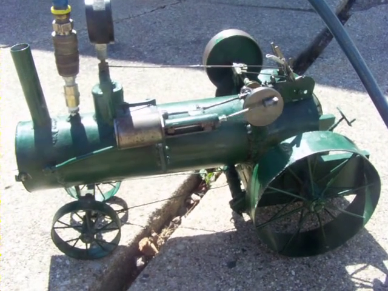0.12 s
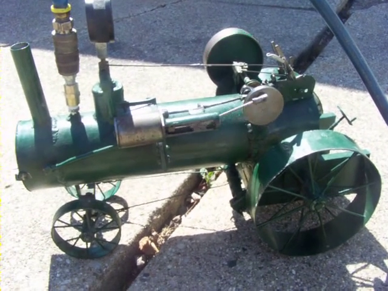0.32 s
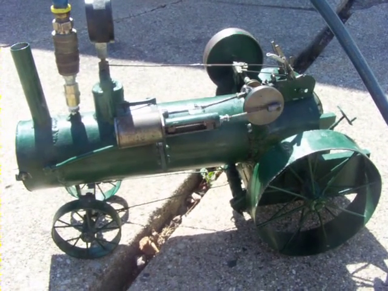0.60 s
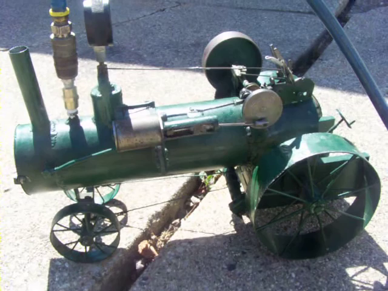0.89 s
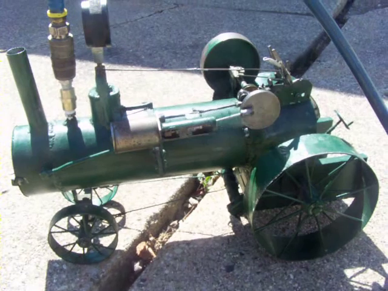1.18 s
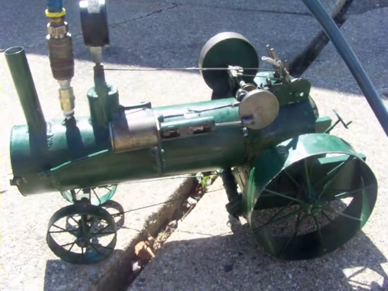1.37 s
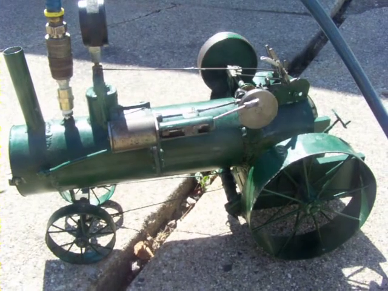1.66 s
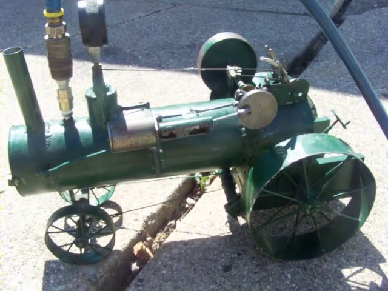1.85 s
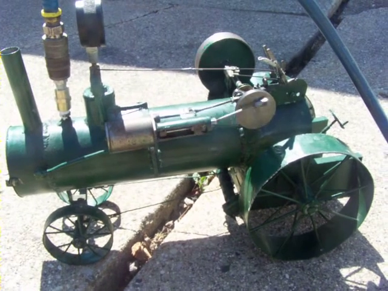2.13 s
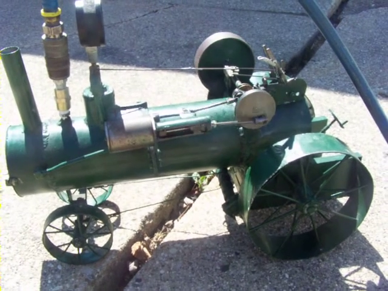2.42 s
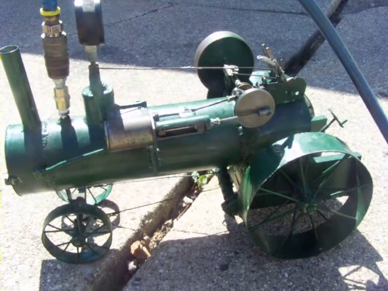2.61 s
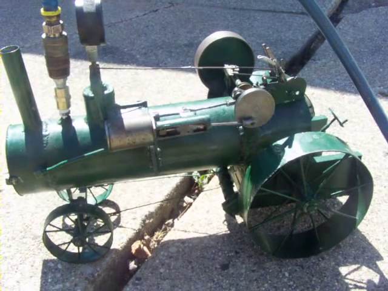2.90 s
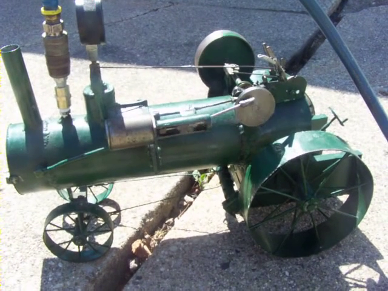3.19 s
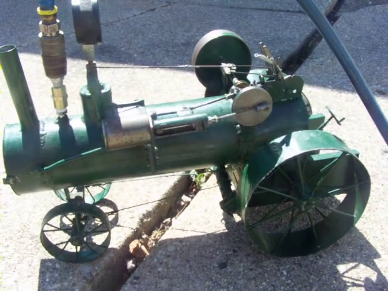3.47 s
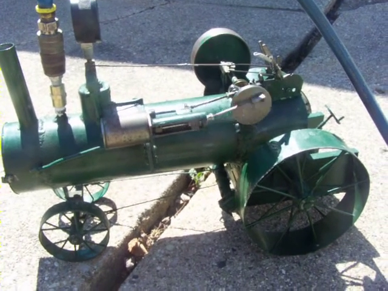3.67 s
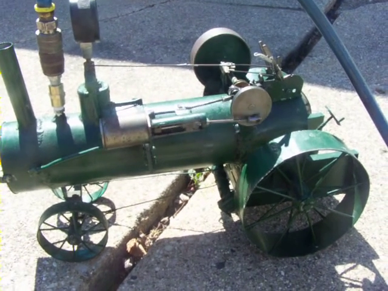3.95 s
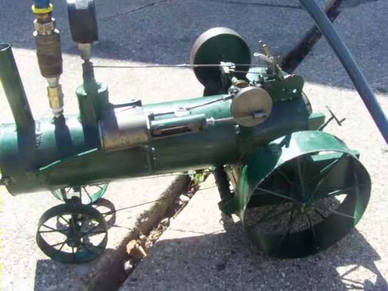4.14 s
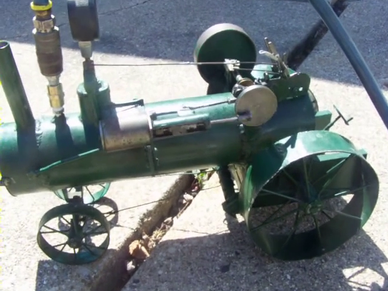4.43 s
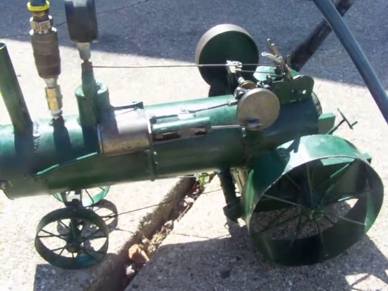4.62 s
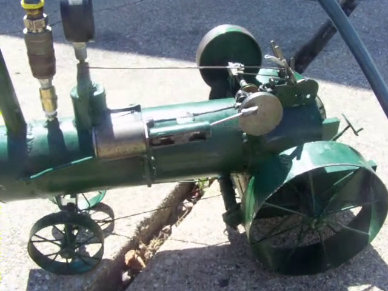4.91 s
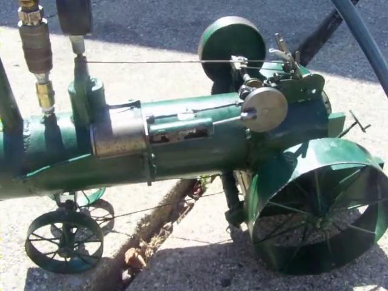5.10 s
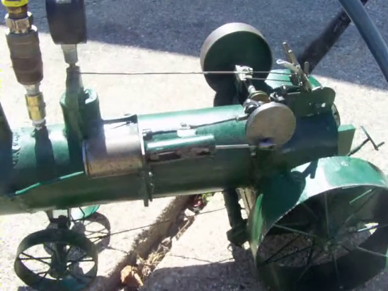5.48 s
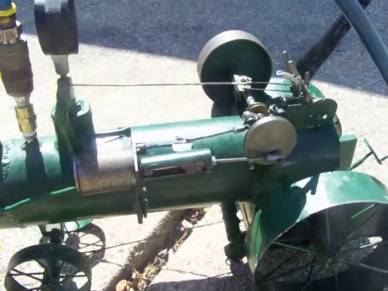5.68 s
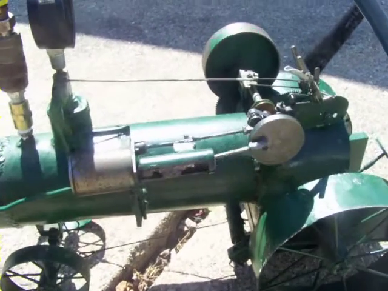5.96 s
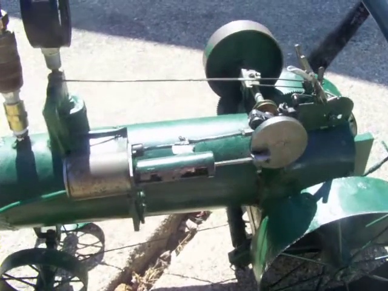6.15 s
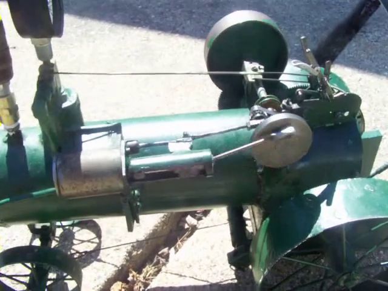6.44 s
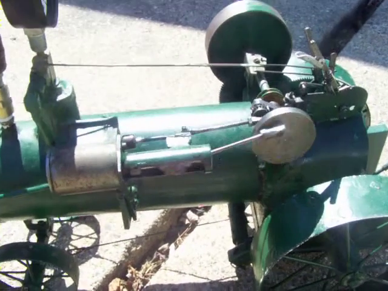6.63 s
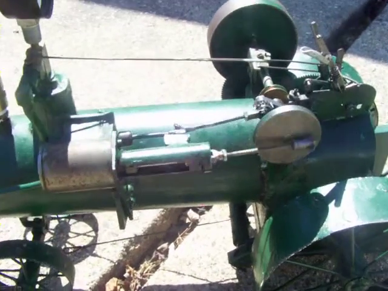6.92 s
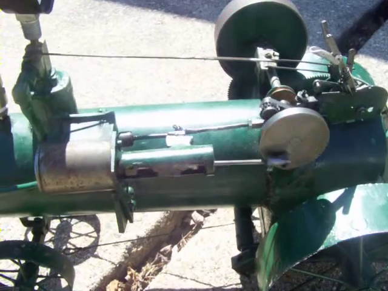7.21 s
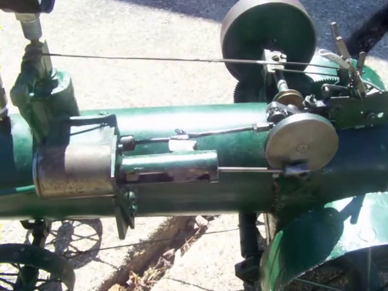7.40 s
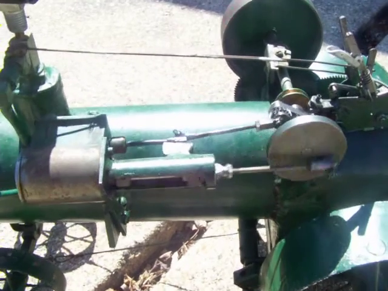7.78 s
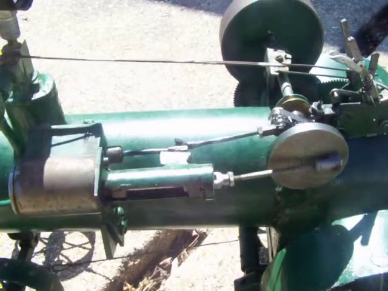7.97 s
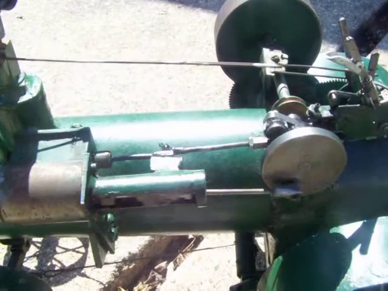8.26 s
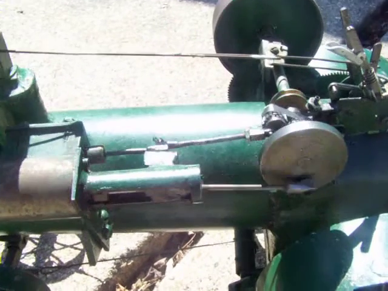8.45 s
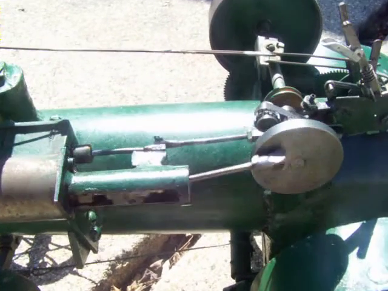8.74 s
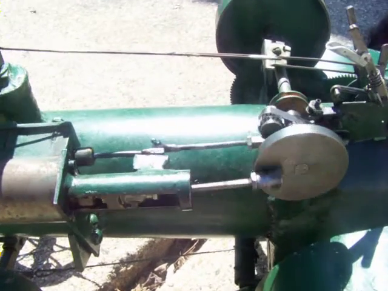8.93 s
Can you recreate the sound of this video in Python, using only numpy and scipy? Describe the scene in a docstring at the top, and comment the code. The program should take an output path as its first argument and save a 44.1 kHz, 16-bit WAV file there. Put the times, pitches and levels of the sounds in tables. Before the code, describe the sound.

Continuous rapid clattering of a miniature engine driven by compressed air: tick, scrape, knock, rattle, knock, repeating unevenly like loose metal joints. Bright hiss pulses with every turn, over weak low thuds. Around five seconds the tone shifts and the hiss dips as the camera moves closer; then link rings become clearer. Dry handling clicks appear occasionally. Open air, little reverberation, dull-topped mono sound with slight clipping on the hardest knocks.

```python
"""A small model engine turns over on compressed air in a yard, heard by a camera that steps in closer.
Each turn the loose motion chatters once and knocks twice: shaped noise and hard contacts ring the boiler shell.
Air hisses through the valve as noise that swells and dips over each turn; low damped sines puff and thud under it.
A few clicks of the camera's case are damped rings; behind them lie a far rumble of noise and a wavering hum.
The recorder ducks, saturates softly, is band-limited and clips on the hardest knocks."""
import sys
import numpy as np
from scipy import signal
from scipy.fft import rfft, irfft, next_fast_len
from scipy.io import wavfile
from scipy.ndimage import uniform_filter1d, map_coordinates

SR = 44100
rng = np.random.default_rng(int(sys.argv[2]) if len(sys.argv) > 2 else 0)


def voltage_ratio(decibels):
    """Convert decibels (scalar or array-like) to amplitude ratios, 20 dB per decade."""
    exponent = np.asarray(decibels, float) / 20
    return 10 ** exponent


def persist_wave(psi):
    """Save psi, clipped to +-1, as 16-bit WAV."""
    counts = np.round(np.clip(psi, -1, 1) * 32767).astype(np.int16)
    wavfile.write(sys.argv[1], SR, np.atleast_2d(counts).T)


N = 400869  # length in samples

# The crank at the back knock of every third turn.
# Each row: time in seconds, base strength of the knocks in dB.
CRANK_MARKS = [(0.0471, -11.5), (0.7282, -11), (1.4016, -11.5), (2.0700, -11.5), (2.7050, -12.5),
               (3.3570, -11.5), (4.0046, -11.5), (4.6528, -12.5), (5.3036, -13.5), (5.9430, -12.5),
               (6.5846, -13), (7.2236, -12), (7.8606, -12.5), (8.4953, -13), (9.1340, -14)]
SKIP_AT_S, SKIP_S = 2.45, .0232  # the recorder drops one block: the rhythm jumps ahead
CHATTER_TURN, FRONT_TURN = .172, .539  # share of a turn after the back knock
LOOSE_S = .0008  # play in the joints scatters each contact in time


def timing():
    """Times of back knock, chatter and front knock for every turn, from the crank's slow drift in speed."""
    marks = np.transpose(CRANK_MARKS)[0]
    unbroken = marks + SKIP_S * (marks > SKIP_AT_S)
    turns = np.arange(3 * len(marks) - 3)[:, None] + [0, CHATTER_TURN, FRONT_TURN]
    s = np.interp(turns / 3, np.arange(len(marks)), unbroken)
    skipped = s - SKIP_S * (s > SKIP_AT_S)
    return (skipped + LOOSE_S * rng.standard_normal(s.shape)).T


def strength(s, mean_db, scatter_db, chance):
    """Level in dB of one kind of contact: moved by the engine's loudness at the microphone and by scatter."""
    loudness_s, loudness_db = np.transpose(ENGINE_LOUDNESS)
    drift_db = np.interp(s, loudness_s, loudness_db) - loudness_db.mean()
    knock_db = np.interp(s, *np.transpose(CRANK_MARKS)) + 0.6 * drift_db  # dB of knock per dB of hiss
    return knock_db + mean_db + scatter_db * np.clip(chance, -2.5, 1.3)


def chatter(s):
    """A dense cluster of blows, then rattling, which is louder when the first blows are softer."""
    luck = rng.standard_normal(len(s))
    first_db = strength(s, mean_db=-1.5, scatter_db=1.8, chance=luck)
    rattle_db = strength(s, mean_db=-7.5, scatter_db=3.2, chance=-luck)
    shape = bursts(s - .002, first_db, rise=0.0016, hold=0.007, t60=0.021)
    shape += bursts(s + 0.0048, rattle_db, rise=0.002, hold=0.0072, t60=0.055)
    return body(shape * habitual(s, share=.4), column=1)


# Back knocks that land harder than the rest.
# Each row: time in seconds, extra level in dB.
HARD_KNOCKS = [(0.5009, 4.5), (1.6239, 0.5), (2.4868, 3), (2.9224, 3), (3.1409, 4), (3.357, 4.5),
               (3.5746, 3.5), (4.0046, 2.5), (4.2222, 3), (5.5164, 3.5), (5.7288, 2), (6.7977, 2),
               (7.2229, 1.5), (7.436, 1.5), (8.2841, 2)]


def reversals(front_s, back_s):
    """Slack is taken up with a tick, the rod scrapes, then the bearing knocks home; the back knock bounces."""
    chance = rng.standard_normal((len(back_s), 6)).T
    front_db = strength(front_s, -0.79, 1.3, chance[2])
    back_db = strength(back_s, -0.73, 1.2, chance[3])
    back_db = back_db + sum(db * (np.abs(back_s - s) < .05) for s, db in HARD_KNOCKS)
    # a strong tick comes with a weaker scrape
    front_tick_db = strength(front_s, -9.5, 5.5, chance[4])
    front_scrape_db = strength(front_s, -9.5, 3.5, -chance[4])
    back_tick_db = strength(back_s, -7, 2.7, chance[5])
    back_scrape_db = strength(back_s, -10, 2.8, -chance[5])

    front = bursts(front_s - .001, front_db, rise=0.0012, hold=0.0069, t60=0.022)
    front *= habitual(front_s, share=.4)
    front += blows(front_s + 0.001025, front_db + 13.5)

    back = bursts(back_s - .0005, back_db + 0.75, rise=0.002, hold=0.0024, t60=0.044)
    back *= contacts(spread_db=8.5)
    back += blows(back_s + .0021, back_db + 20.5) - blows(back_s + 0.00284, back_db + 17)
    bounce_s = back_s + .006 + .0006 * chance[0]
    back += blows(bounce_s, back_db + 12.5 + 1.3 * chance[1])

    ticks = bursts(front_s - .015, front_tick_db, rise=0.001, hold=0.00065, t60=0.016)
    ticks += bursts(back_s - .0188, back_tick_db, rise=.0007, hold=0.0011, t60=0.016)
    scrapes = bursts(front_s - .011, front_scrape_db - 1, rise=0.0016, hold=0.0085, t60=0.0076)
    scrapes += bursts(back_s - .015, back_scrape_db - 1, rise=0.0036, hold=.014, t60=0.005)
    slack = (ticks + scrapes) * contacts(spread_db=6.5)
    slack += blows(front_s - .0142, front_tick_db + 11) + blows(back_s - .018, back_tick_db + 11)
    return body(front, column=2) + body(back, column=3) + body(slack, column=4)


# The link's own ring.
# Each row: frequency in Hz, mean level against the knock strength in dB, t60 in seconds.
LINK_RING = [(1390, -13.5, .1), (2250, -8.5, 0.1), (2930, -11, .07), (3770, -11, .08), (4400, -13, .06),
             (5215, -10.5, .06)]


def link(s):
    """The chattering link rings on briefly as softly started damped sines, louder from close by."""
    near = np.interp(s, *np.transpose(CAMERA_PLACE)[::2])
    near_db = 20 * np.log10(near + 1e-3)
    fade_in = np.minimum(np.arange(SR // 10) / (.003 * SR), 1)
    out = 0
    for hz, mean_db, t60 in LINK_RING:
        luck = rng.standard_normal(len(s))
        db = strength(s, mean_db, 3, luck) + near_db
        out = out + strikes(s, db, fade_in * ring(hz, t60))
    return out


# Colour of the valve tap.
# Each row: frequency in Hz, relative gain in dB.
VALVE_COLOUR = [(150, -24.5), (300, -8.5), (900, -3), (2000, 1), (4000, 2), (8000, -26.5)]


def valve(s):
    """A soft tap as the valve gear turns over, once a turn, ringing the shell's modes."""
    db = -31 + rng.standard_normal(len(s))
    taps = bursts(s, db, rise=0.0032, hold=0.0032, t60=0.039) * contacts(spread_db=3.0)
    taps += blows(s + .001, db + 21.5)
    modes = [(hz, width, voltage_ratio(side_db)) for hz, width, side_db, _ in SHELL_MODES]

    def gain(hz):
        return voltage_ratio(along(hz, *np.transpose(VALVE_COLOUR))) * np.hypot(1, humps(hz, modes))
    return coloured(taps, gain)


def crank(back_s, chatter_s, front_s):
    """Turns of the crank at each sample, pinned by the three contacts of every turn."""
    count = np.arange(len(back_s))
    times = np.ravel(np.transpose([back_s, chatter_s, front_s]))
    turns = np.ravel(np.transpose([count - .17, count, count + .37]))
    # run on a little past both ends
    times = np.r_[times[0] - .1, times, times[-1] + .1]
    turns = np.r_[turns[0] - .45, turns, turns[-1] + .46]
    return np.interp(np.arange(N) / SR, times, turns)


# Slow loudness of the engine at the microphone.
# Each row: time in seconds, hiss level in dB before the swing within each turn.
ENGINE_LOUDNESS = [(0.0, -22), (1.2, -24), (1.6, -22.5), (1.92, -25), (2.63, -22), (3.0, -24.5),
                   (4.18, -22), (4.61, -26.5), (4.91, -31.5), (5.34, -25), (5.62, -24), (6.13, -32.5),
                   (6.96, -26), (8.48, -26.5), (8.76, -29), (9.09, -26)]
# Hiss through the ports over one turn, from the chatter on.
# Each row: share of the turn from 0 to 1, change of hiss in dB.
PORT_SWING = [(0, -5), (.1, -5), (.2, -1.5), (.3, -1.5), (.45, -2.5), (0.581, -4), (0.661, -1.5), (.74, -1),
              (.82, -3), (.88, -1), (1, -2.5)]


def hiss(turns):
    """Air through the ports is noise that swells and dips with the crank, rough with small rattles."""
    level_db = curves(ENGINE_LOUDNESS)[0] + np.interp(turns % 1, *np.transpose(PORT_SWING))
    flutter_db = 0.82 * wobble(25) + 1.25 * wobble(160)
    return body(voltage_ratio(level_db + flutter_db) * contacts(spread_db=3.5), column=5)


def exhaust(chatter_s, front_s, back_s):
    """Low puffs of air just ahead of chatter and front knock; the back stroke thuds in the shell."""
    scatter_db = 2.4 * rng.standard_normal((len(back_s), 4)).T
    puffs = strikes(chatter_s - .005, -36 + scatter_db[0], ring(180, t60=.025))
    puffs += strikes(front_s - .004, -32.5 + scatter_db[1], ring(130, t60=.035))
    thud = ring(486, t60=.06) + 2.5 * ring(270, t60=0.018)  # the first is the boiler's lowest ring
    thuds = strikes(back_s - .019, -46.5 + scatter_db[2], thud)
    thuds += strikes(back_s, -43.5 + scatter_db[3], thud)
    return puffs + thuds


# Colour of each part from the side, from above and from near.
# Each row: frequency in Hz, then relative gain in dB of chatter, front knock, back knock, tick and scrape, hiss.
FROM_SIDE = [(262, -39, -22, -20, -21, -17.5), (493, -26.5, -39.5, -25, -26.5, -25.5),
             (860, -36, -27.5, -29, -24.5, -21), (1270, -21.5, -26, -13.5, -13.5, -21),
             (1430, -19, -19.5, -13.5, -21.5, -12), (2035, -19, -12.5, -18, -15.5, -13),
             (2524, -10, -11.5, -0.5, -2.5, -7.5), (2740, -3, -3.5, -2.5, -0.5, -2),
             (3650, -9, -15.5, -3.5, -4, 1.5), (4330, 2.5, 4.5, 3, -4.5, -1.5),
             (5010, -5.5, -5, -18.5, -9, -5.5), (5990, -11.5, -15.5, -20, -18.5, -15.5),
             (6640, -27, -20, -18.5, -17.5, -18.5), (7010, -17.5, -26.5, -27.5, -14.5, -13),
             (8180, -39.5, -40, -35, -37, -29)]
FROM_ABOVE = [(250, -18, -23.5, -27.5, -25, -7), (495, -44.5, -32, -25.5, -25.5, -19),
              (864, -26.5, -18, -11.5, -5, -14), (1250, -26, -29, -21, -4.5, -10.5),
              (1460, -15.5, -3.5, -8.5, -4.5, -7), (1940, -22, -19.5, -12, -13, -8.5),
              (2320, -10, -14, -7.5, 7, -9), (2920, -6, -0.5, -3.5, 2.5, -6.5),
              (3700, -1, -2.5, -8.5, 3.5, 1), (4200, -3.5, 2, 4.5, -1, 0),
              (4750, -0.5, 8, -18.5, -1.5, -4.5), (5900, -7.5, -2.5, -18, -5.5, -10.5),
              (6350, -6.5, -16.5, -15, -25.5, -6), (7300, -19, -5, -17, -9.5, -14),
              (7950, -29, -17.5, -25.5, -24.5, -23.5)]
FROM_NEAR = [(250, -32, -21.5, -26, -22, -30.5), (490, -27.5, -25, -30, -14.5, -20.5),
             (875, -26.5, -23.5, -24, -27.5, -14), (1300, -9.5, -13, -14, -19.5, -15),
             (1503, -12, -10.5, -18, -7.5, -2.5), (2050, -7.5, 0.5, 4, 4, 1),
             (2330, -1.5, -4.5, -4.5, -10, -5), (2830, -7, -10.5, -2.5, -3, -5),
             (3600, -8, -12, 1, -1.5, -2.5), (3960, 1.5, -0.5, -8, -4, 1), (4940, 4.5, 1.5, 3.5, -5.5, 1),
             (5780, -4, -9, -14, -9, -7.5), (6400, -12.5, -13.5, -22.5, -16.5, -16.5),
             (7470, -4, -10.5, -19.5, -24, -6), (7930, -17, -21.5, -40, -25, -17)]
# Where the camera stands.
# Each row: time in seconds, share above from 0 to 1, share near from 0 to 1; the side has the rest.
CAMERA_PLACE = [(0, 0.02, 0), (4.5, 0, 0.01), (4.8, 0.96, 0.04), (5.2, 0.95, 0.08), (5.6, 0.1, 0.75),
                (5.95, 0.2, 0.85), (6.5, 0.1, .95), (9.1, 0.06, 0.94)]
# Modes of shell, wheels and rods.
# Each row: frequency in Hz, width in Hz, relative gain in dB from the side, relative gain in dB from near.
SHELL_MODES = [(659, 3.1, -2.5, 15.5), (774, 8.2, 17.5, 5.5), (864.2, 7.9, 18, 4.5), (1088, 17, 11, 2.5),
               (1380, 43, 5, 11), (1481, 34, 7.5, 11.5), (1714, 32, -0.5, -0.5), (1938, 22, 2.5, 8.5),
               (2277, 48, -1, 12.5), (2820, 134, 6, 7), (3318, 34, 8, 5), (3706, 38, -13, 9.5),
               (4325, 110, 4.5, 1.5), (4680, 77, -1.5, 3), (5050, 36, -8.5, 4), (5893, 132, 5, 9),
               (7140, 200, 2.5, -1)]


def body(x, column):
    """A part's sound rings the resonant shell; its colour crossfades as the camera moves."""
    above, near = curves(CAMERA_PLACE)
    shares = np.sqrt(np.clip([1 - above - near, above, near], 0, 1))
    out = 0
    for share, table, closeness in zip(shares, (FROM_SIDE, FROM_ABOVE, FROM_NEAR), (0, .5, 1)):
        table = np.transpose(table)
        modes = [(hz, width, voltage_ratio(side_db + closeness * (near_db - side_db)))
                 for hz, width, side_db, near_db in SHELL_MODES]

        def gain(hz):
            colour = voltage_ratio(along(hz, table[0], table[column]))
            return colour * np.hypot(1, humps(hz, modes)) * (hz > 120)
        out = out + share * coloured(x, gain)
    return out


# Treble of the engine while the camera moves.
# Each row: time in seconds, gain of the top in dB.
TREBLE_LEVEL = [(0, 0.5), (4.6, -1), (4.95, 2.5), (5.3, 1), (5.6, -4.5), (6.1, -2.5), (6.6, -0.5),
                (7.2, 0.5), (9.09, 1.5)]


def shaded(x):
    """The engine's sound above about 6 kHz brightens and dulls over time."""
    highpass = signal.butter(2, 6000, "high", fs=SR, output="sos")
    top = signal.sosfiltfilt(highpass, x)
    return x + (voltage_ratio(curves(TREBLE_LEVEL)[0]) - 1) * top


# Clicks of the camera's case.
# Each row: time in seconds, then relative level in dB of snap, bright ring, hollow ring.
CASE_CLICKS = [(3.3645, 1, -18, -23), (3.4035, -7, -8, -19), (4.133, -27, -15, -25),
               (4.5966, 7, -5.5, -17.5), (4.6226, -9, -7.5, -26), (4.6325, -18, -13.5, -15),
               (4.644, -12, -15, -30), (5.4560, -30, -13, -40), (5.4653, -19, -6, -34),
               (7.6115, -6, -6, -20)]
# Rings of the case: bright, hollow, hollow overtone.
# Each row: frequency in Hz, t60 in seconds.
CASE_RINGS = [(2200, .015), (800, .012), (1400, .009)]


def case():
    """Dry clicks close to the microphone: a very short snap, a bright and a hollow ring, rough with crackle."""
    s, snap_db, bright_db, hollow_db = np.transpose(CASE_CLICKS)
    bright, hollow, overtone = [ring(hz, t60) for hz, t60 in CASE_RINGS]
    snap = strikes(s, snap_db + 0.5, ring(2600, t60=0.0025))
    rings = strikes(s, bright_db, bright) + strikes(s, hollow_db, hollow + 1.2 * overtone)
    clicks = snap + rings * (1 + 0.63 * wobble(700))
    return coloured(clicks, lambda hz: 1 / np.sqrt(1 + (380 / (hz + 1)) ** 8))  # too small for bass


# Colour of the far rumble.
# Each row: frequency in Hz, relative gain in dB.
RUMBLE_COLOUR = [(13, -40.5), (22, 4.5), (120, 0), (335, -4.5), (392, -20), (606, -12.5), (661, -6),
                 (700, -11.5), (910, -45), (1540, -120)]
# Level of the rumble.
# Each row: time in seconds, level in dB before a slow random waver.
RUMBLE_LEVEL = [(0, -45), (2, -47.5), (4, -46.5), (5.4, -43), (6.1, -52.5), (7, -45.5), (9.09, -49)]
# Tones of the hum.
# Each row: centre frequency in Hz, relative level in dB.
HUM_TONES = [(108, -5), (135, -2)]
# Swell of the hum.
# Each row: time in seconds, level in dB.
HUM_SWELL = [(0.0, -55), (0.8, -47.5), (1.2, -53), (1.85, -58.5), (2.2, -51), (3.1, -55), (3.69, -53),
             (4.05, -42), (4.84, -46.5), (5.32, -43), (5.52, -50), (6.05, -58.5), (7.1, -46), (7.42, -51.5),
             (8.4, -47), (9.09, -60)]


def yard():
    """Far rumble of filtered noise, and a low hum of sines that waver in pitch and come and go."""
    rumble = coloured(rng.standard_normal(N), lambda hz: voltage_ratio(along(hz, *np.transpose(RUMBLE_COLOUR))))
    rumble_db = curves(RUMBLE_LEVEL)[0] + 1.7 * wobble(2.1)
    hum = 0
    for hz, db in HUM_TONES:
        phase = 2 * np.pi * np.cumsum(hz + 2.5 * wobble(6)) / SR
        hum = hum + voltage_ratio(db + 1.5 * wobble(3.8)) * np.sin(phase)
    return voltage_ratio(rumble_db) * unit(rumble) + voltage_ratio(curves(HUM_SWELL)[0]) * unit(hum)


def contacts(spread_db, even=0.0022):
    """Many small blows and a few hard ones, of steady power over any `even` seconds."""
    x = rng.standard_normal(N) * voltage_ratio(spread_db * rng.standard_normal(N))
    return x / np.sqrt(np.abs(uniform_filter1d(x ** 2, round(even * SR))) + 1e-9)


def habitual(times, share):
    """Contacts that partly repeat, since the same loose parts meet in the same order every turn."""
    pattern = contacts(spread_db=5.5)[:SR // 20]
    habit = strikes(times - .004, np.zeros(len(times)), pattern)
    return np.sqrt(share) * habit + np.sqrt(1 - share) * contacts(spread_db=6)


def bursts(times, db, rise, hold, t60):
    """Envelope of blows that rise, hold and die away; rise, hold and t60 in seconds."""
    t = np.arange(SR // 10) / SR
    shape = np.minimum(t / rise, 1) * voltage_ratio(-60 * np.maximum(t - hold, 0) / t60)
    out = np.zeros(N + len(t))
    for s, level in zip(times, db):
        out[max(round(s * SR), 0):][:len(t)] += voltage_ratio(level) * shape
    return out[:N]


def blows(times, db):
    """Single hard contacts, one sample each."""
    return np.bincount(np.clip(np.round(times * SR).astype(int), 0, N - 1), voltage_ratio(db), N)


def strikes(times, db, shape):
    """One copy of a shape at each time."""
    return signal.oaconvolve(blows(times, db), shape)[:N]


def ring(hz, t60):
    """A damped sine, 0.1 s long, losing 60 dB in t60 seconds."""
    t = np.arange(SR // 10) / SR
    return np.sin(2 * np.pi * hz * t) * voltage_ratio(-60 * t / t60)


def humps(hz, modes):
    """Summed gain of (Hz, width, gain) resonances."""
    return np.sqrt(sum(g ** 2 / (1 + (2 * (hz - c) / w) ** 2) for c, w, g in modes))


def coloured(x, gain, size=16384):
    """x through the minimum-phase filter of energy 1 whose shape is gain, a function of frequency."""
    cepstrum = irfft(np.log(gain(np.fft.rfftfreq(size, 1 / SR)) + 1e-6))
    cepstrum[1:size // 2] *= 2  # folding makes the filter causal
    cepstrum[size // 2 + 1:] = 0
    response = irfft(np.exp(rfft(cepstrum)))
    return signal.oaconvolve(x, response / np.linalg.norm(response))[:N]


def along(hz, points_hz, values):
    """Values joined on a log-frequency axis."""
    return np.interp(np.log(hz + 1), np.log(np.add(points_hz, 1)), values)


def curves(rows):
    """One value per sample for each column after the time."""
    s, *columns = np.transpose(rows)
    return [np.interp(np.arange(N) / SR, s, column) for column in columns]


def wobble(rate):
    """A smooth random curve, rate knots a second."""
    knots = rng.standard_normal(int(N * rate / SR) + 4)
    return map_coordinates(knots, [np.arange(N) * rate / SR])


def unit(x):
    """Scaled to rms 1."""
    return x / np.sqrt(np.mean(x ** 2) + 1e-20)


def ducked(x, knee_db, slope, release):
    """Gain control: smoothed power above the knee pulls the gain down; release is its time constant in s."""
    keep = np.exp(-1 / (release * SR))
    power = signal.lfilter([1 - keep], [1, -keep], x ** 2)
    return x * (1 + power / voltage_ratio(knee_db) ** 2) ** -slope


def scene():
    """Engine, camera case and yard, in one channel."""
    back_s, chatter_s, front_s = timing()
    motion = chatter(chatter_s) + link(chatter_s)
    motion += reversals(front_s, back_s) + valve(chatter_s + .044)
    air = hiss(crank(back_s, chatter_s, front_s)) + exhaust(chatter_s, front_s, back_s)
    return (shaded(motion + air) + case() + yard())[None]


def band_limit(x):
    """A steep low-pass at the top of the band."""
    return signal.sosfilt(signal.butter(12, 15800, fs=SR, output="sos"), x)


# Frequency response of the recorder, with a steep upper limit.
# Each row: frequency in Hz, gain in dB.
RECORDER_BAND = [(20, -13.5), (50, -2.5), (8200, -0.5), (8600, -10.5), (8900, -17.5), (9150, -59),
                 (22000, -120)]


def record(dry):
    """Gain control, a soft ceiling, a steep band limit; the converter shaves the hardest knocks."""
    x = voltage_ratio(3) * ducked(dry, knee_db=-22, slope=.36, release=.016)
    x = x / (1 + np.abs(x / .81) ** 4) ** .25
    size = next_fast_len(N + SR // 10)
    band = voltage_ratio(along(np.fft.rfftfreq(size, 1 / SR), *np.transpose(RECORDER_BAND)))
    x = irfft(rfft(x, size) * band, size)[:, :N]
    return band_limit(np.clip(x, -.72, .72))


dry = scene()
out = record(dry)
persist_wave(out)
```